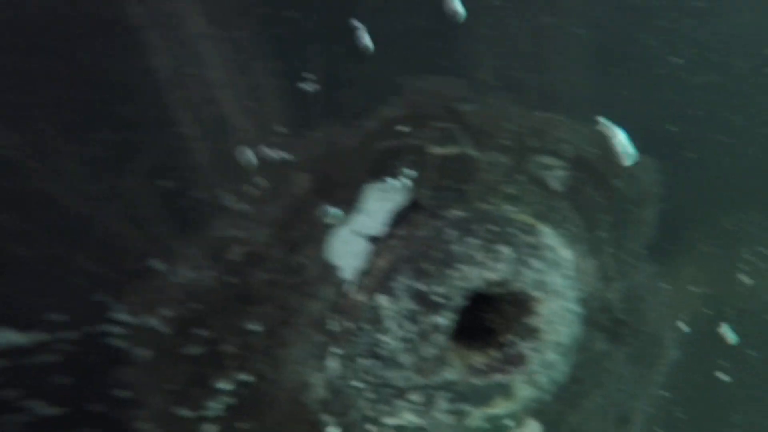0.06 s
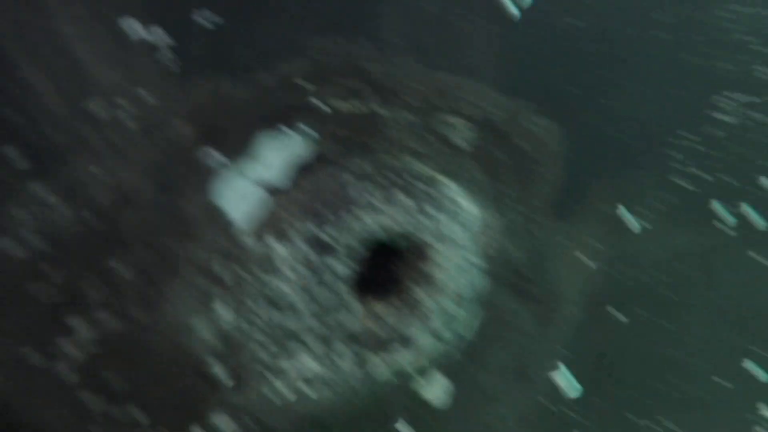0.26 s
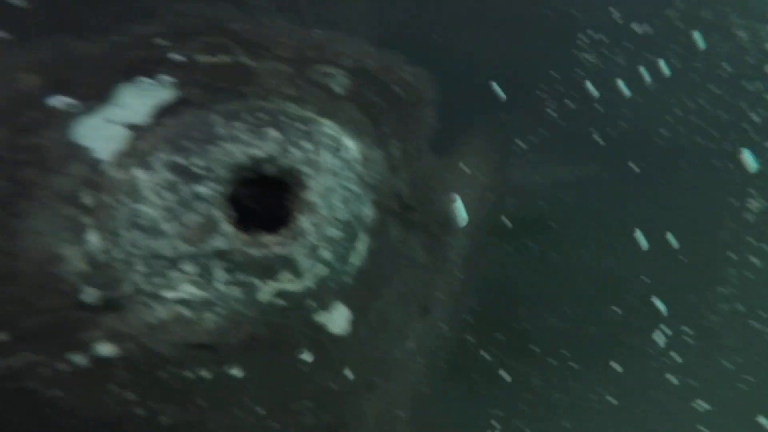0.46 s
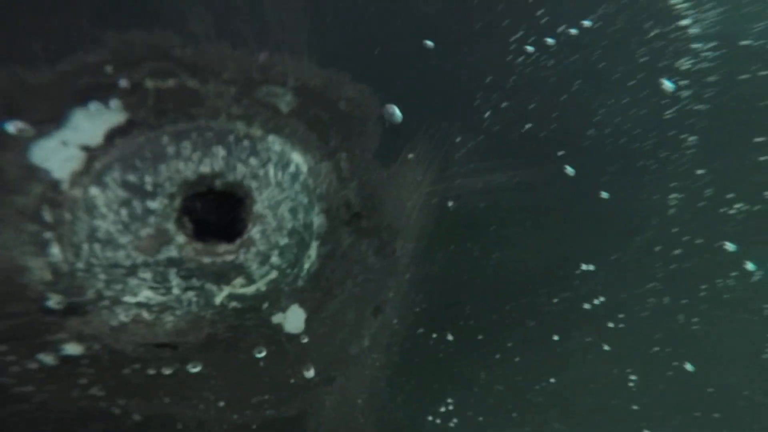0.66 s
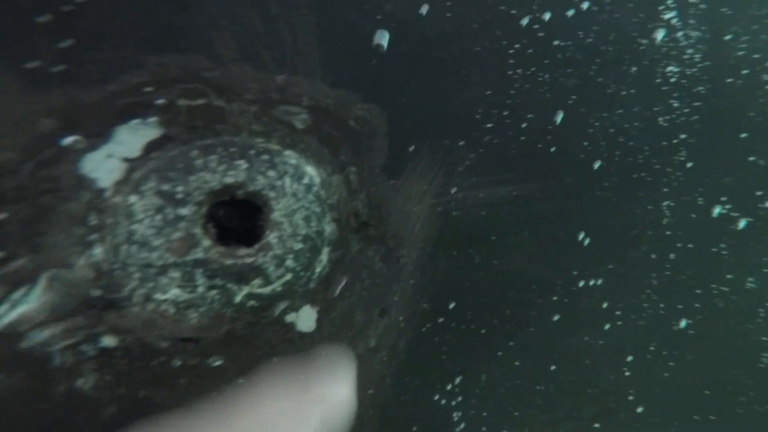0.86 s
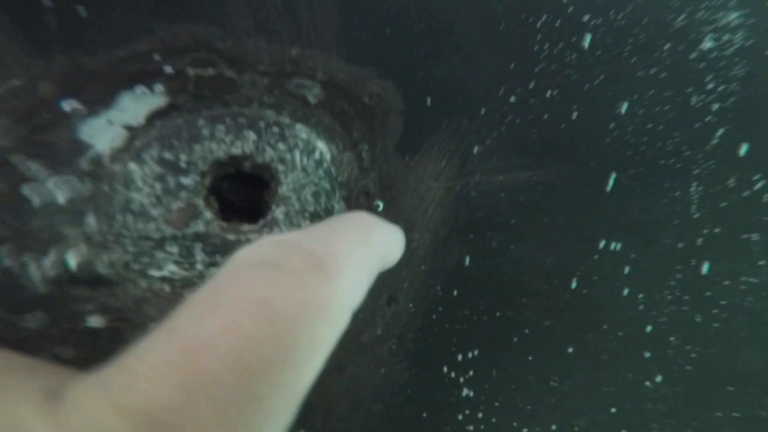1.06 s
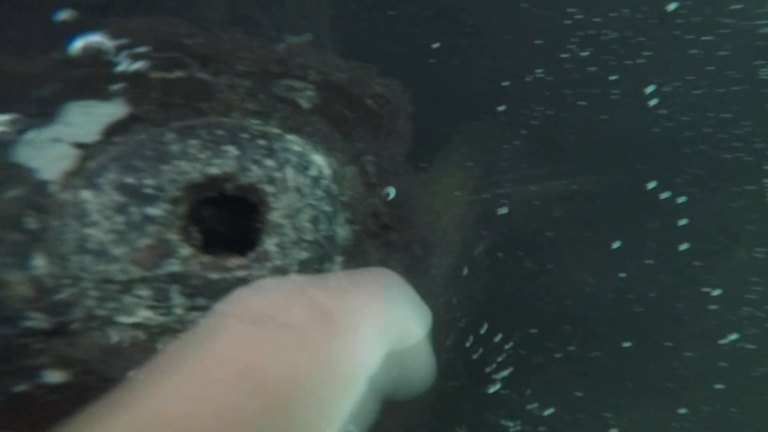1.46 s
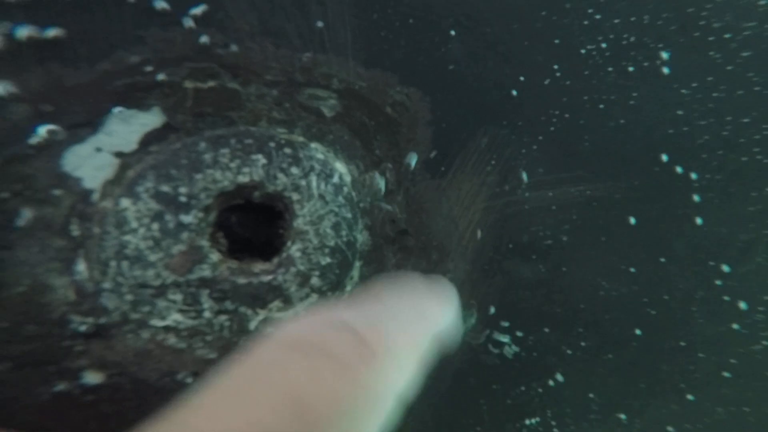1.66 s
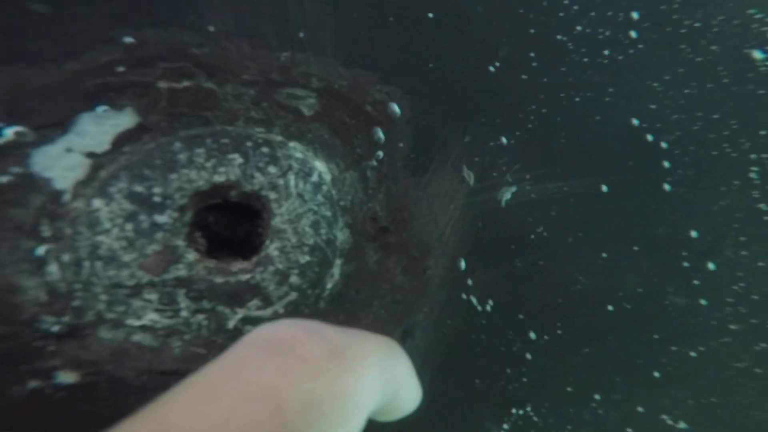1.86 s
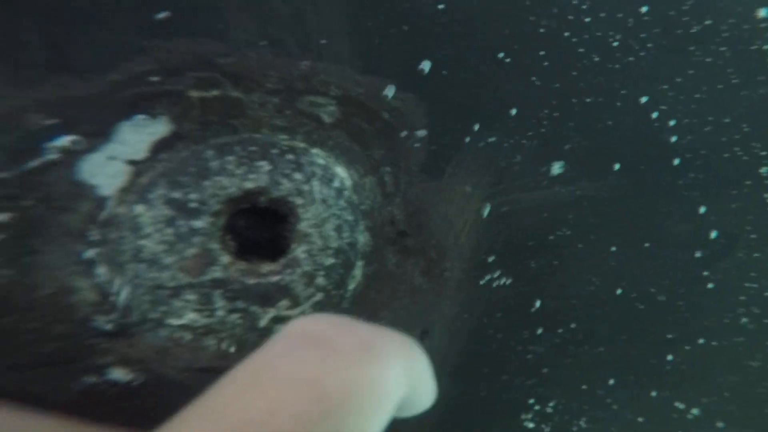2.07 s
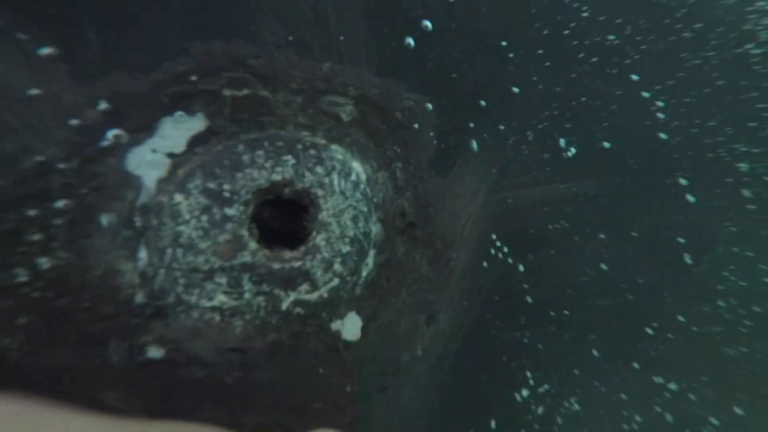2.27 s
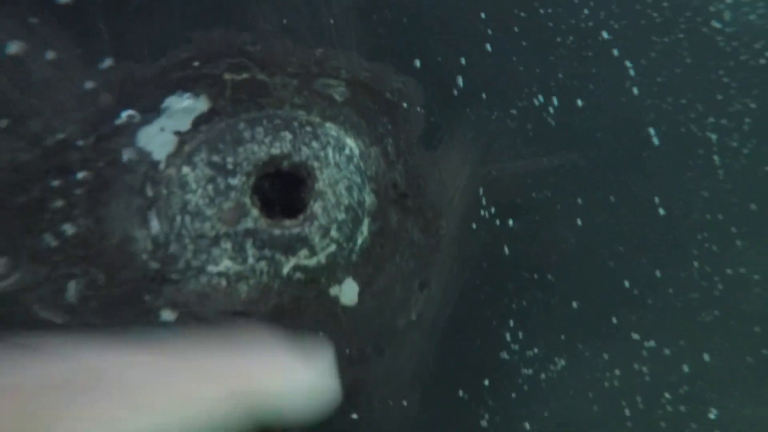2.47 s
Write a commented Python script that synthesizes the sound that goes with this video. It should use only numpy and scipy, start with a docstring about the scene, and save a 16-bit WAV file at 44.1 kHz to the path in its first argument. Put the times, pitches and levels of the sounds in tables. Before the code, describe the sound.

A hand scrapes a crusty boat hull fitting underwater, with muffled bumps and low rumble.

```python
"""Scrubbing a hull under water

At a boat's hull, with the microphone in a sealed camera housing, a hand scrubs a fitting's fouled rim.
Hard scrapes stick and slip and end in dull bumps; light rubs, crunches of crust and a few bubbles fall
between. A fast, even knocking, like a distant engine, fades early under the rumble of moving water."""
import sys
import numpy as np
from scipy import signal
from scipy.fft import rfft, irfft, next_fast_len
from scipy.io import wavfile
from scipy.ndimage import uniform_filter1d, minimum_filter1d

SR = 44100
rng = np.random.default_rng(int(sys.argv[2]) if len(sys.argv) > 2 else 0)


def bounce(signal):
    """Save signal as a 16-bit WAV file at the path given by the first command-line argument."""
    frames = np.transpose(np.atleast_2d(signal))
    limited = np.clip(frames, -1, 1)
    pcm = np.round(limited * 32767).astype(np.int16)
    wavfile.write(sys.argv[1], SR, pcm)


N = 110250


def undb(db):
    """Decibels to gain."""
    return 10 ** (np.asarray(db) / 20)


def unit(x):
    """Scale to rms 1."""
    return x / np.sqrt(np.mean(x ** 2) + 1e-18)


def seconds(count):
    """A time axis of count samples."""
    return np.arange(count) / SR


def add(out, start_s, x):
    """Mix a sound in at a time."""
    i = max(int(start_s * SR), 0)
    out[i:i + len(x)] += x[:max(len(out) - i, 0)]


def colour(x, points, shift=1, focus_hz=1000, focus_db=0):
    """Causal filter through (Hz, dB) points, shifted in pitch, with an optional extra resonance."""
    focus_width_oct, rolloff_db_per_oct = 0.16, 30
    size = next_fast_len(len(x) + 4096) // 2 * 2
    octaves = np.log2(np.maximum(np.arange(size // 2 + 1) * SR / size, 1))
    hz, db = np.array(points).T
    curve_db = np.interp(octaves, np.log2(hz * shift), db)
    curve_db += focus_db * np.exp(-.5 * ((octaves - np.log2(focus_hz)) / focus_width_oct) ** 2)
    curve_db -= rolloff_db_per_oct * np.maximum(octaves - np.log2(hz[-1] * shift), 0)
    # minimum phase: the ringing follows each click
    cepstrum = irfft(np.log(undb(curve_db)))
    cepstrum[1:size // 2] *= 2
    cepstrum[size // 2 + 1:] = 0
    return irfft(rfft(x, size) * np.exp(rfft(cepstrum)))[:len(x)]


def friction(pressure, spectrum, level_db, shift=1, focus_hz=1000, focus_db=0):
    """Stick-slip: dense, uneven clicks ring a body; level_db is the level at full pressure."""
    slips_per_s, spread_db = 1800, 2.5
    count = len(pressure)
    slipping = rng.random(count) < slips_per_s / SR
    size = undb(spread_db * np.minimum(rng.exponential(1, count), 3))
    noise = rng.standard_normal(count)
    clicks = slipping * size * np.sign(noise) + 0.029 * noise
    body = unit(colour(clicks * pressure, spectrum, shift, focus_hz, focus_db))
    return body * np.sqrt(np.mean(pressure ** 2)) * undb(level_db)


def water():
    """Eddies buffet the housing over a faint, steady wash of water."""
    # swell of the rumble: time_s, level_db
    swell = [(.34, -29.5), (.39, -27), (.92, -27.5), (1.03, -18.5), (1.1, -36.5), (1.3, -24.5), (1.88, -32),
             (1.96, -21.5), (2.02, -31), (2.24, -26), (2.31, -29.5)]
    # rumble on the housing: frequency_hz, gain_db
    rumble_spectrum = [(15, -8), (32, 0), (100, 2), (170, -0.5), (250, -9), (700, -33.5)]
    # steady wash: frequency_hz, gain_db
    wash_spectrum = [(400, -4.5), (1450, -11.5), (2500, -21), (3800, -26), (5200, -25), (7500, -34.5),
                     (10000, -31.5), (15000, -51.5)]
    swirl_db, swirls_per_s, wash_db = 1.5, 40, -46
    t = seconds(N)
    swirl = np.interp(t * swirls_per_s, np.arange(200), rng.standard_normal(200))
    rumble = unit(colour(rng.standard_normal(N) * undb(swirl_db * swirl), rumble_spectrum))
    wash = unit(colour(rng.standard_normal(N), wash_spectrum))
    return rumble * undb(np.interp(t, *np.array(swell).T)) + undb(wash_db) * wash


def knocking():
    """Nearly the same clatter comes round on every turn, like an engine far off."""
    # fade of the knocking: time_s, level_db
    fade = [(0, -34), (.25, -37), (.4, -40), (2.3, -46)]
    # tone of the knocks: frequency_hz, gain_db
    spectrum = [(50, -17.5), (220, 8.5), (340, -7.5), (410, 2), (630, 0), (800, -20), (1200, -11),
                (1800, -17), (2150, -26)]
    turns_per_s, first_s, decay_s, scatter = 23.74, .029, 0.011, 0.62
    out, t = np.zeros(N), seconds(count=3000)
    clatter = rng.standard_normal(len(t))
    for turn in range(int(N / SR * turns_per_s) + 1):
        knock = clatter + scatter * rng.standard_normal(len(t))
        add(out, first_s + turn / turns_per_s, knock * np.exp(-t / decay_s))
    return unit(colour(out, spectrum)) * undb(np.interp(seconds(N), *np.array(fade).T))


def crunches():
    """Crust gives way in a short bright burst and crumbles on."""
    # breaks in the crust: peak_s, level_db, resonance_hz
    breaks = [(.079, -45, 2950), (.338, -27, 3250), (0.639, -45.5, 3560), (.848, -46, 2750),
              (0.904, -30.5, 2430), (1.071, -33, 1580), (1.115, -38, 2370), (1.153, -30.5, 2800),
              (1.277, -25.5, 1500), (1.408, -32, 1820), (2.062, -33, 2840)]
    # breaking crust: frequency_hz, gain_db
    spectrum = [(500, -6.5), (1100, 6), (1700, 17.5), (2400, 9), (3300, 2.5), (4500, -11), (10000, -23.5)]
    half_length_s, tail_s, tail_db = .004, .015, -9
    out, t = np.zeros(N), seconds(count=6000)
    lead_s = 2 * half_length_s
    burst = np.exp(-((t - lead_s) / half_length_s) ** 2)
    crumble = undb(tail_db) * np.minimum(t / lead_s, np.exp(-(t - lead_s) / tail_s))
    for peak_s, db, hz in breaks:
        add(out, peak_s - lead_s, friction(burst + crumble, spectrum, db, focus_hz=hz, focus_db=8))
    return out


def ticks():
    """Brittle specks of growth snap, each with its own high ring."""
    # snapping specks: peak_s, level_db, ring_hz
    snaps = [(.199, -52, 5500), (0.31, -38.5, 2440), (0.655, -42.5, 5600), (0.685, -49, 5500),
             (0.904, -40.5, 7500), (.97, -53.5, 7000), (1.449, -37, 3760), (1.474, -49.5, 8000),
             (2.475, -46, 3650)]
    spectrum = [(1500, 0), (4500, 8), (13000, -18.5)]  # frequency_hz, gain_db
    half_length_s = 0.0036
    out, t = np.zeros(N), seconds(count=2000)
    lead_s = 2 * half_length_s
    burst = np.exp(-((t - lead_s) / half_length_s) ** 2)
    for peak_s, db, hz in snaps:
        add(out, peak_s - lead_s, friction(burst, spectrum, db, focus_hz=hz, focus_db=15))
    return out


def bumps():
    """A soft contact pushes and releases the water once; some leave a low ring in the hull."""
    # soft contacts: middle_s, pitch_hz, peak_db
    contacts = [(0.2497, 131, -13.5), (.395, 56, -15), (.802, 61, -13.5), (0.952, 92, -6), (1.162, 125, -6),
                (1.195, 109, -5), (1.242, 128, -8.5), (1.358, 135, -14.5), (1.428, 134, -8.5),
                (1.456, 124, -2.5), (1.521, 252, -4.5), (1.653, 91, -13), (1.764, 217, -9),
                (2.051, 153, -1.5), (2.067, 154, -8.5), (2.198, 67, -4)]
    # low rings of the hull: start_s, pitch_hz, t60_s, peak_db
    hull_rings = [(1.733, 213, .13, -6), (2.078, 102, .36, -10)]
    out, t = np.zeros(N), seconds(N)
    for middle_s, hz, db in contacts:
        phase = 2 * np.pi * hz * (t - middle_s)
        out -= undb(db) * phase * np.exp(.5 - .5 * np.minimum(phase ** 2, 100))
    for start_s, hz, t60_s, db in hull_rings:
        add(out, start_s, undb(db - 60 * t / t60_s) * np.sin(2 * np.pi * hz * t))
    return out


def bubble(hz, t60_s, db):
    """One bubble rings briefly, wobbling in level and rising a little in pitch."""
    attack_s, glide_per_s, roughness = 0.0026, 1, 0.3
    t = seconds(count=5000)
    wobble = unit(colour(rng.standard_normal(len(t)), [(250, -15), (1000, -31)]))
    envelope = (1 - np.exp(-t / attack_s)) * undb(db - 60 * t / t60_s)
    phase = 2 * np.pi * hz * t * (1 + glide_per_s * t / 2)
    return envelope * (1 + roughness * wobble) * np.sin(phase)


def bubbles(fizz_count=45):
    """A few clear plops among many tiny bubbles that pop at random."""
    # clear plops: start_s, pitch_hz, t60_s, level_db
    plops = [(.6295, 484, 0.021, -4.5), (.6305, 798, 0.024, -6), (0.727, 1538, 0.12, -24.5),
             (0.73, 2644, 0.029, -17), (0.738, 1470, 0.027, -17), (0.7698, 627, 0.045, -14),
             (.928, 560, 0.015, -9)]
    low_hz, high_hz, fizz_db, spread_db, ring_cycles = 1600, 8160, -53, 1.5, 52
    out = np.zeros(N)
    for start_s, hz, t60_s, db in plops:
        add(out, start_s, bubble(hz, t60_s, db))
    for when, pitch, faintness in rng.random((fizz_count, 3)):
        hz = low_hz * (high_hz / low_hz) ** pitch
        db = fizz_db - spread_db * np.log(faintness + 0.071)
        add(out, when * N / SR, bubble(hz, ring_cycles / hz, db))
    return out


def soft_swells():
    """Soft swells of noise: light rubs, and a brief splutter just after the first plops."""
    # the splutter, then the rubs: middle_s, half_length_s, level_db, resonance_hz
    swells = [(0.64, 0.011, -34.5, 1120), (0.677, 0.025, -40, 2200), (0.976, .036, -31.5, 1720),
              (1.151, 0.0088, -22.5, 1470), (1.286, 0.018, -36, 2380), (1.339, 0.013, -27.5, 1680),
              (1.65, 0.013, -25.5, 3070), (1.722, 0.0061, -19.5, 1370), (1.956, 0.016, -37, 1900),
              (2.451, 0.034, -43.5, 1690)]
    # tone of the swells: frequency_hz, gain_db
    spectrum = [(200, -1.5), (600, -5), (1000, -14), (1500, -9.5), (2000, -11.5), (3100, -21), (4300, -33),
                (7000, -37.5)]
    out, t = np.zeros(N), seconds(count=11000)
    lead_s = t[-1] / 2
    for middle_s, half_length_s, db, hz in swells:
        envelope = np.exp(-.5 * ((t - lead_s) / half_length_s) ** 2)
        add(out, middle_s - lead_s, friction(envelope, spectrum, db, focus_hz=hz, focus_db=10.5))
    return out


def rasp(pressure, db, resonance_hz):
    """The skin catches again and again; each catch detunes the rasp and favours another pitch."""
    # resonances of the housing: frequency_hz, gain_db
    spectrum = [(700, -23), (1250, -6), (1520, 0.5), (1700, -9.5), (1900, 9), (2080, -2.5), (2300, -16),
                (2850, -11.5), (3250, -29), (3800, -21.5), (4700, -40), (5500, -25.5), (6500, -40),
                (8500, -41)]
    unshifted_hz, catch_s, detune = 1921, .008, .025
    out, t = np.zeros(len(pressure)), seconds(len(pressure))
    end_s = t[pressure > .01][-1]
    for middle_s in np.arange(0, end_s, catch_s):
        catch = np.cos(np.pi / 2 * np.clip((t - middle_s) / catch_s, -1, 1))
        shift = resonance_hz / unshifted_hz * (1 + detune * rng.standard_normal())
        favoured_hz = rng.uniform(1250, 3300)
        out += friction(pressure * catch, spectrum, db, shift, focus_hz=favoured_hz, focus_db=6.5)
    return out


def scrapes():
    """Each hard scrape rasps in the housing's resonances, growls lower down and booms just after."""
    # hard strokes: start_s, length_s, rasp_db, growl_db, boom_db, resonance_hz
    strokes = [(1.149, 0.0055, -21, -22, -7.5, 1746), (1.18, 0.013, -19, -14.5, -15, 1890),
               (1.203, 0.017, -22.5, -21, -13, 1920), (1.224, 0.0079, -24.5, -19, -11, 2000),
               (1.415, 0.015, -27.5, -23, -11.5, 1840), (1.443, 0.0092, -17, -16, -13.5, 1900),
               (1.47, 0.018, -18.5, -19, -12, 1967), (1.506, 0.029, -25.5, -19, -15, 1904),
               (1.724, 0.016, -22.5, -18, -5.5, 1900), (1.745, 0.016, -25, -18, -11, 1915),
               (2.021, 0.014, -25.5, -17.5, -13, 1840), (2.039, 0.009, -27.5, -17, -17, 1820),
               (2.06, 0.0024, -14, -10.5, -10.5, 1850), (2.185, 0.011, -19.5, -18, -13.5, 1826)]
    # growl of a scrape: frequency_hz, gain_db
    growl_spectrum = [(150, -33), (300, 11), (420, 2), (560, 2.5), (700, 3), (880, -16.5), (1300, -16.5),
                      (3000, -66)]
    # deep boom of a scrape: frequency_hz, gain_db
    boom_spectrum = [(18, -31.5), (35, 3.5), (60, 0.5), (125, -17), (180, 1.5), (250, -2), (330, -11),
                     (500, -20.5), (1200, -59.5)]
    attack_s, release_s, boom_lag_s, boom_release_s = .004, .0045, .0021, .007
    out, t = np.zeros(N), seconds(count=5000) - attack_s / 2
    grip = np.minimum(t / attack_s + .5, 1) ** 2
    for start_s, length_s, rasp_db, growl_db, boom_db, resonance_hz in strokes:
        since_release = np.maximum(t - length_s, 0)
        pressure = grip * np.exp(-since_release / release_s)
        boom_envelope = grip * np.exp(-since_release / boom_release_s)
        touch_s = start_s - attack_s / 2
        add(out, touch_s, rasp(pressure, rasp_db, resonance_hz))
        add(out, touch_s, friction(pressure, growl_spectrum, growl_db))
        add(out, touch_s + boom_lag_s, friction(boom_envelope, boom_spectrum, boom_db))
    return out


def scene():
    """All sources meet at the one microphone in the housing."""
    mix = water() + knocking() + scrapes() + bumps() + soft_swells() + crunches() + ticks() + bubbles()
    return mix[None]


def record(dry):
    """A limiter holds the loudest peaks under full scale; the top is cut."""
    ceiling, window_samples, top_hz = .92, 221, 15000
    gain = np.minimum(1, ceiling / (np.abs(dry) + 1e-9))
    gain = uniform_filter1d(minimum_filter1d(gain, window_samples), window_samples)
    lowpass = signal.ellip(8, .2, 70, top_hz, fs=SR, output="sos")
    return signal.sosfilt(lowpass, dry * gain)


dry = scene()
out = record(dry)
bounce(out)
```